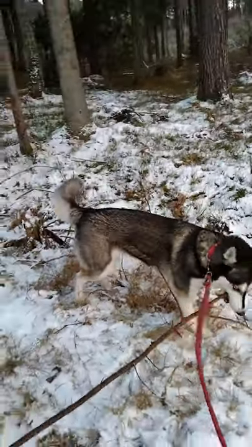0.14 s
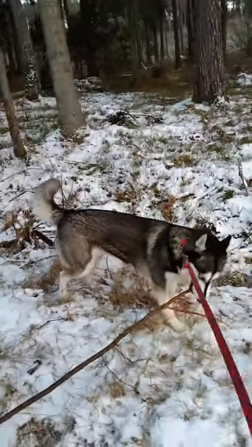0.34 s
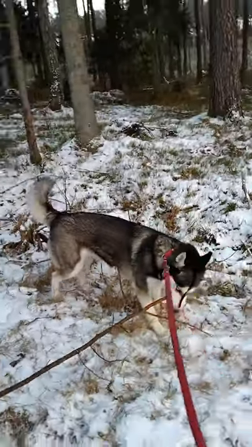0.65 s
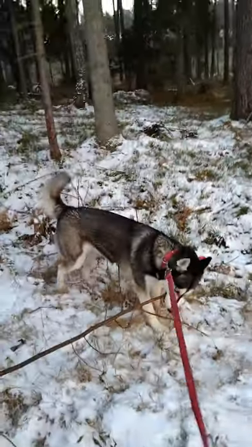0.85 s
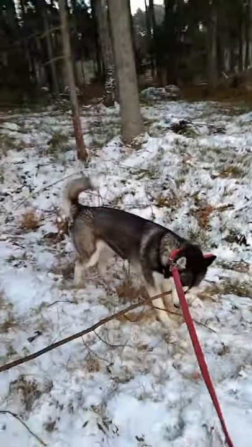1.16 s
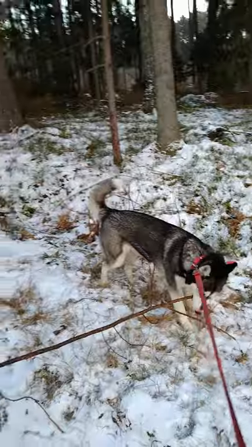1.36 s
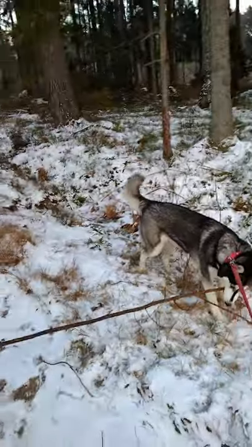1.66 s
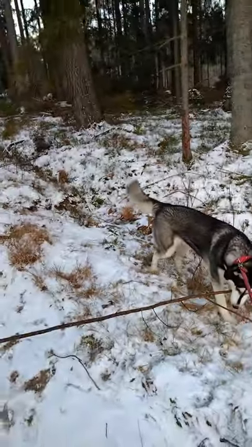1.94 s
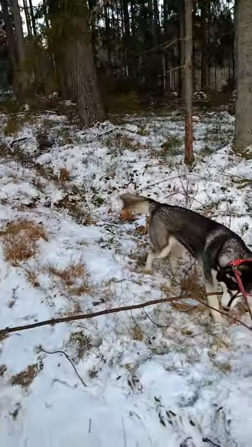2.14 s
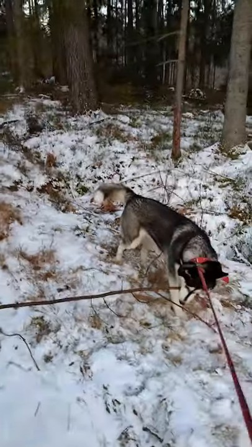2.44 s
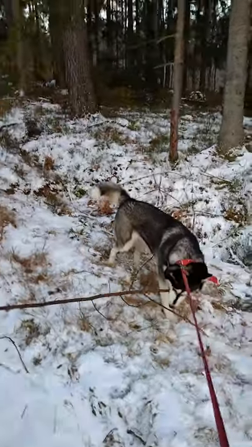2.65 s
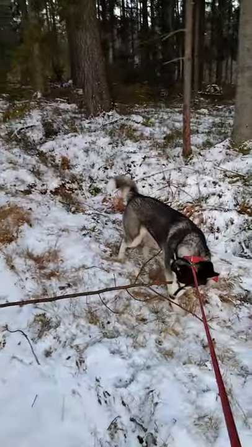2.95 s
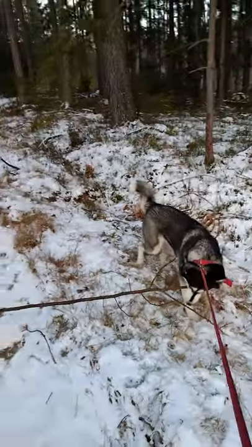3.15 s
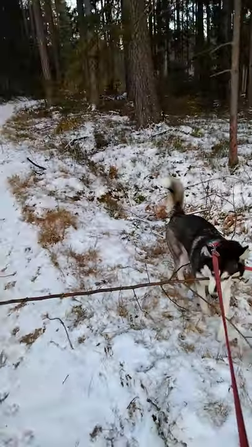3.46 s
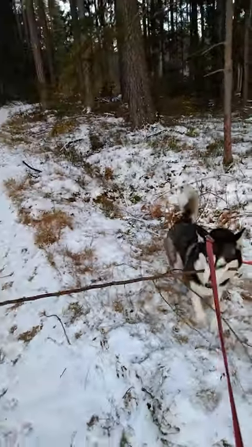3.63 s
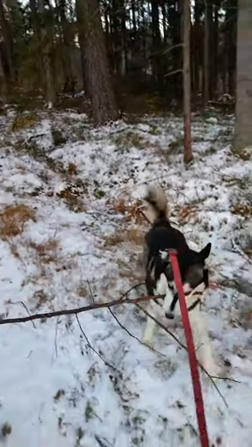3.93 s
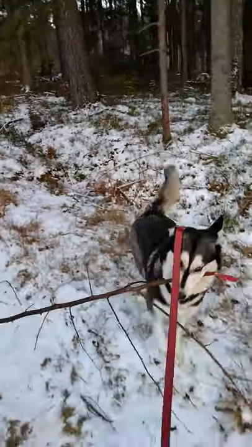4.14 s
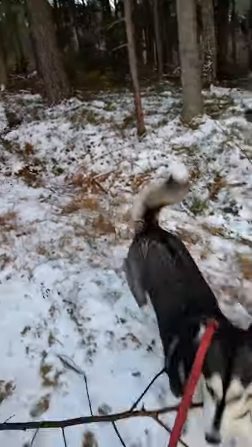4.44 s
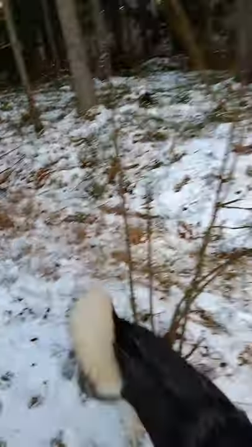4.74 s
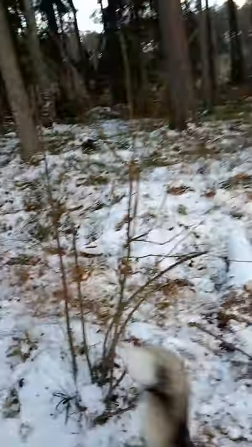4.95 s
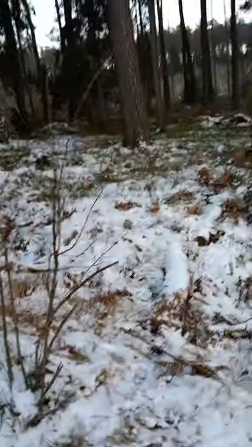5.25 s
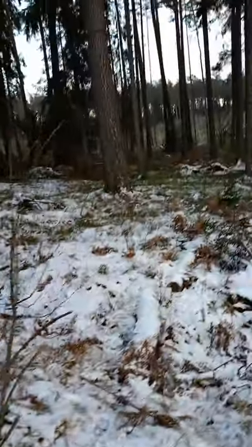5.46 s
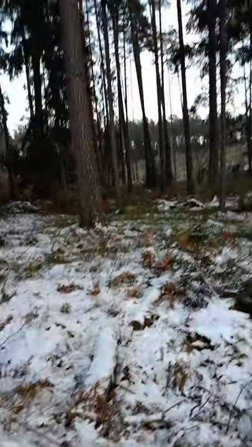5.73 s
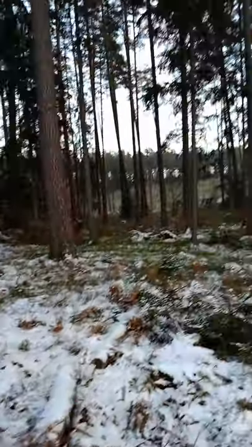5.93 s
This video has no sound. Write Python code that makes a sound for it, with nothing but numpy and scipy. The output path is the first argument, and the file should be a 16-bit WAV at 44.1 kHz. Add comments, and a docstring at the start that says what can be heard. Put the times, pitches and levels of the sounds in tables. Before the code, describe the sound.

Paws and boots crunch softly through thin forest snow, then dry undergrowth rustles and twigs snap sharply as the walk quickens, with leash-hook ticks.

```python
"""Snow crunches softly under a foot, then paws and boots move on through thin snow and dry undergrowth in a forest.
Dense random clicks ring as crushed crystals and rustling leaves; short noise bursts make twigs and stems crack.
Fading tones make soft thuds and the ticks of a leash hook, and a rising tone makes a thin squeak.
A noise suppressor darkens the quiet bands, and filters take away the deepest bass and highest treble."""
import sys
import numpy as np
from scipy import signal
from scipy.io import wavfile
from scipy.ndimage import uniform_filter1d

SR = 44100
rng = np.random.default_rng(int(sys.argv[2]) if len(sys.argv) > 2 else 0)


def unload_audio(sound):
    """Save the sound as a 16-bit wav file, at the path given as the first command line argument."""
    columns = np.transpose(np.atleast_2d(sound))
    # keep every value between -1 and 1, then stretch to whole-number steps
    steps = np.round(np.clip(columns, -1, 1) * 32767)
    wavfile.write(sys.argv[1], SR, steps.astype(np.int16))


def gain_from_db(level_db):
    """Convert decibel levels to linear amplitude factors (20 dB per decade)."""
    decades = np.asarray(level_db, float) / 20
    return 10 ** decades


N = 268511  # length in samples

# soft footfalls: start_s, push_level_db, pitch_hz
FOOTFALLS = [(0.162, -51.5, 192), (0.497, -51, 400), (0.757, -56, 178), (0.887, -51.5, 313),
             (1.078, -59.5, 350), (1.364, -58.5, 151), (1.44, -46.5, 308), (2.061, -55, 282),
             (2.573, -60.5, 95), (2.642, -51.5, 146), (3.134, -53, 500), (3.345, -61, 139),
             (3.732, -47.5, 190), (4.387, -60.5, 467), (4.545, -54.5, 130), (4.75, -49.5, 130),
             (4.975, -44, 165), (5.346, -46, 216), (5.706, -48.5, 106)]
# bright resonances of rustle and microphone port: pitch_hz, width_hz, relative_level_db
RUSTLE_RESONANCES = [(3000, 1210, -5.5), (3800, 626, -1), (5000, 1110, -8), (7400, 1180, -4.5),
                     (10000, 37000, -19.5), (15200, 1120, -9)]
# resonances of crushed snow: pitch_hz, width_hz, relative_level_db
SNOW_RESONANCES = [(1008, 687, 3), (1406, 404, 5.5), (1860, 362, 3)]
# levels between events: crunch_db, rustle_db, upper_packing_db, lower_packing_db, rumble_db
QUIET_DB = (-63.5, -68.5, -74.5, -81, -80.5)
WIDEST_SNAP_HZ = 1970  # widest resonance of a snapping twig or stem
EVENT_S = 0.07  # longest ring of a single event


def rms_one(x):
    """Scale to an average (rms) strength of 1."""
    return x / np.sqrt(np.mean(x ** 2) + 1e-20)


def band(x, low_hz, high_hz, order=2):
    """Keep the pitches between two limits (Butterworth band-pass)."""
    return signal.sosfilt(signal.butter(order, [low_hz, high_hz], "band", fs=SR, output="sos"), x)


def resonate(x, hz, width_hz):
    """Ring like one small body: a resonance with gain 1 at its top."""
    r = np.exp(-np.pi * width_hz / SR)
    feedback = [1, -2 * r * np.cos(2 * np.pi * hz / SR), r * r]
    return signal.lfilter([(1 - r * r) / 2, 0, (r * r - 1) / 2], feedback, x)


def ring_all(x, resonances):
    """Ring several resonances side by side, each at its own level."""
    return sum(gain_from_db(level_db) * resonate(x, hz, width_hz) for hz, width_hz, level_db in resonances)


def drift(rate_hz):
    """Slow random wandering with spread 1, from smoothed noise."""
    r = np.exp(-2 * np.pi * rate_hz / SR)
    wander = signal.lfilter([1], [1, -2 * r, r * r], rng.standard_normal(N + SR))
    return rms_one(wander[SR:])


def grains(per_s, spread_db, clump_db, smooth):
    """Random clicks of uneven size come in clumps over smooth noise; pockets of crust give way and die off."""
    collapses_per_s, collapse_fade_s, collapse_db = 55.0, 0.005, -6.5
    born = rng.random(N) < per_s / SR
    sizes = gain_from_db(spread_db * np.minimum(rng.exponential(1, N), 5)) * rng.choice([-1, 1], N)
    pocket_sizes = gain_from_db(collapse_db) * np.minimum(rng.exponential(1, N), 4)
    pockets = (rng.random(N) < collapses_per_s / SR) * pocket_sizes
    fade = np.exp(-1 / (collapse_fade_s * SR))
    collapsing = 1 + signal.lfilter([1], [1, -fade], pockets + 1e-18)
    clicks = rms_one(born * sizes) + smooth * rng.standard_normal(N)
    return collapsing * gain_from_db(clump_db * drift(20.7)) * clicks


def texture(source, resonances, patchy_db):
    """Grains ring every resonance, each flickering on its own."""
    layers = []
    for k, (hz, width_hz, level_db) in enumerate(resonances):
        flicker = gain_from_db(level_db + patchy_db * drift(7.3))
        layers.append(flicker * (-1) ** k * resonate(source, hz, width_hz))
    return rms_one(sum(layers))


def placed(times, sounds):
    """Short sounds laid down at their start times; overlaps add."""
    out = np.zeros(N + SR)
    for start_s, sound in zip(times, sounds):
        out[round(start_s * SR):][:len(sound)] += sound
    return out[:N]


def squeak():
    """A thin tone glides upward, swelling and fading, as of a crust slipping."""
    # one squeak: start_s, length_s, from_hz, to_hz, level_db
    glide = (.992, .036, 2950, 3850, -61)
    start_s, length_s, low_hz, high_hz, level_db = glide
    part = np.clip((np.arange(N) / SR - start_s) / length_s, 0, 1)  # share of the glide done
    phase = 2 * np.pi * np.cumsum(low_hz + (high_hz - low_hz) * part) / SR
    return gain_from_db(level_db) * np.sin(np.pi * part) * np.sin(phase)


def hook_ticks():
    """The small metal hook of the leash rings in short, pure, fading tones."""
    # one ring a row: start_s, level_db, pitch_hz
    hook_rings = [(5.293, -38.5, 9030), (5.353, -27.5, 8400), (5.353, -29.5, 13600), (5.3635, -28, 8400),
                  (5.354, -30.5, 5000), (5.518, -32, 13650)]
    start_s, level_db, hz = np.transpose(hook_rings)[:, :, None]
    t = np.arange(int(EVENT_S * SR)) / SR
    rings = gain_from_db(level_db) * np.exp(-t / 0.006) * np.sin(2 * np.pi * hz * t)
    return placed(start_s[:, 0], rings)


def thuds():
    """A soft push rings the ground for a few cycles, with a dull puff of snow."""
    t = np.arange(int(EVENT_S * SR)) / SR
    rise = t / 0.004  # the push is strongest after 4 ms
    push = rise * np.exp(1 - rise)
    noises = rng.standard_normal((len(FOOTFALLS), len(t)))
    sounds = []
    for (_, push_db, hz), noise in zip(FOOTFALLS, noises):
        puff = rms_one(band(noise, hz, 2300, order=3))
        sounds.append(gain_from_db(push_db) * push * (np.sin(2 * np.pi * hz * t) + 0.6 * puff))
    return placed(np.transpose(FOOTFALLS)[0], sounds)


def stem_snaps():
    """The loudest dry stems break in one short tick each: broad, with a pitch of its own."""
    # start_s, peak_db, pitch_hz
    loud_stems = [(1.286, -39, 14800), (4.06, -42, 13000), (4.815, -30.5, 7400), (5.0547, -20.5, 6850),
                  (5.183, -24, 14900), (5.293, -32.5, 12600), (5.378, -30.5, 7850), (5.466, -33, 15000),
                  (5.492, -37, 14300), (5.571, -31.5, 6470), (5.829, -26.5, 8540), (5.8618, -36, 7000),
                  (5.9225, -28, 3670), (5.944, -30.5, 3800)]
    t = np.arange(int(EVENT_S * SR)) / SR
    noises = rng.standard_normal((len(loud_stems), len(t)))
    ticks = []
    for (_, peak_db, hz), noise in zip(loud_stems, noises):
        burst = noise * np.exp(-t / 0.0022)
        pitched = resonate(burst, hz, min(0.16 * hz, WIDEST_SNAP_HZ))
        tick = 3.2 * pitched + ring_all(burst, RUSTLE_RESONANCES)
        ticks.append(gain_from_db(peak_db) * tick / abs(tick).max())
    return placed(np.transpose(loud_stems)[0], ticks)


def cracks():
    """Splintering twigs and crust: a noise burst gives a knock and a bright snap at its own pitch."""
    # start_s, knock_peak_db, snap_peak_db, snap_pitch_hz, length_ms
    breaks = [(0.364, -38.5, -52, 2830, 8.2), (0.766, -44, -46, 4220, 4.4), (0.796, -39.5, -45, 3660, 12),
              (1.82, -37, -43.5, 4150, 5.7), (2.063, -50.5, -67, 1500, 7.5), (3.063, -38, -47, 5130, 3.2),
              (3.141, -41.5, -52, 3000, 15), (3.9453, -30, -42.5, 3650, 1.9),
              (4.1431, -32, -35, 14600, 4.5), (4.224, -28, -36, 6440, 9), (4.378, -34, -56, 5860, 2.8),
              (4.433, -33.5, -60, 3700, 5), (4.564, -33.5, -46, 7400, 8.6), (4.99, -30.5, -31, 13200, 2.8),
              (5.0169, -25, -27.5, 3800, 0.68), (5.1389, -32.5, -32.5, 3430, 5.7),
              (5.3511, -34.5, -29.5, 5000, 10.3), (5.3621, -30.5, -24.5, 6120, 7.4),
              (5.411, -39, -28, 6500, 8.8), (5.517, -39, -32.5, 5950, 9.2), (5.717, -26, -25.5, 7400, 13.6),
              (5.746, -30, -31, 3800, 33), (5.8, -54, -33.5, 3800, 13), (5.828, -39, -30, 15400, 14),
              (5.8636, -25.5, -20.5, 3350, 0.55), (6.008, -41.5, -35, 3600, 21),
              (6.069, -41.5, -43, 3360, 8.8)]
    t = np.arange(int(EVENT_S * SR)) / SR
    splinters = rng.standard_normal((len(breaks), len(t)))
    sounds = []
    for (_, knock_db, snap_db, hz, length_ms), noise in zip(breaks, splinters):
        length_s = length_ms / 1000
        # short cracks break sharply, long ones swell; splintering stops short, then a faint tail
        sharp = 2 * np.exp(-length_s / 0.006 - t / 0.0012)
        swell = np.minimum(8 * t / length_s, 1) * np.exp(-(t / length_s) ** 3)
        tail = 0.12 * np.exp(-t / 0.01)
        burst = noise * (sharp + swell + tail)
        lowest_hz = 1006 * gain_from_db(0.4 * (knock_db + 34.5))  # harder knocks are brighter
        knock = band(ring_all(burst, SNOW_RESONANCES), lowest_hz, 2300)
        width_hz = min(0.44 * hz, WIDEST_SNAP_HZ)
        pitched = resonate(resonate(burst, hz, width_hz), hz, width_hz)
        snap = pitched + 0.86 * ring_all(burst, RUSTLE_RESONANCES)
        knock = gain_from_db(knock_db) * knock / abs(knock).max()
        snap = gain_from_db(snap_db) * snap / abs(snap).max()
        sounds.append(knock + snap)
    return placed(np.transpose(breaks)[0], sounds)


def summed(shapes, levels_db, still_db):
    """Overlapping events add in power over a quiet floor; gives a level in dB at every sample."""
    event_power = gain_from_db(2 * np.asarray(levels_db))[:, None] * shapes ** 2
    power = gain_from_db(2 * still_db) + event_power.sum(axis=0)
    return np.interp(np.arange(N), np.arange(len(power)) * 64, 10 * np.log10(power))


def efforts():
    """Steps rise fast, sag and lift off; brushes swell and fade; footfalls leave a dying rumble."""
    # a foot sinks into the snow: start_s, length_s, crunch_db, lower_packing_db
    steps = [(0.0, 0.24, -54.5, -58.5), (0.484, 0.57, -57, -72.5), (0.765, 0.2, -52, -61.5),
             (1.426, 0.35, -53.5, -59.5), (2.271, 0.36, -54, -63.5), (2.962, 0.18, -55.5, -78),
             (3.139, 0.38, -50.5, -60), (3.45, 0.1, -51, -67), (3.593, 0.3, -47, -58.5),
             (3.935, 0.17, -47, -74), (4.083, 0.066, -47, -64.5), (4.225, 0.15, -48, -73),
             (4.408, 0.12, -50.5, -65.5), (4.592, 0.15, -52, -61.5), (4.71, 0.43, -52.5, -57.5),
             (4.967, 0.11, -58, -56.5), (5.14, 0.1, -58.5, -57.5), (5.36, 0.42, -49.5, -63.5),
             (5.543, 0.14, -60, -55.5), (5.7, 0.25, -67, -58), (5.83, 0.07, -45, -58)]
    # legs brush through the undergrowth: middle_s, length_s, rustle_db
    brushes = [(0.216, 0.29, -61), (0.505, 0.6, -62.5), (0.748, 0.19, -62), (1.255, 0.18, -61.5),
               (1.594, 0.61, -61), (2.218, 0.19, -65), (2.498, 0.34, -57.5), (2.78, 0.3, -61),
               (2.96, 0.094, -61), (3.665, 0.5, -50.5), (3.986, 0.16, -67), (4.113, 0.17, -55.5),
               (4.323, 0.23, -58.5), (4.495, 0.16, -51.5), (4.743, 0.38, -51.5), (5.004, 0.26, -51),
               (5.212, 0.36, -52), (5.478, 0.39, -51), (5.761, 0.42, -49), (5.99, 0.15, -51.5)]
    rise_s, lift_s, packing_linger_s = 0.019, 0.078, 0.081
    crunch_sag, upper_sag, lower_sag, rumble_fade = 8.5, 26, 38.5, 33.5  # dB per second
    still_crunch, still_rustle, still_upper, still_lower, still_rumble = QUIET_DB
    t = np.arange(N // 64 + 2) * 64 / SR  # one point every 64 samples

    start_s, length_s, crunch_db, lower_db = np.transpose(steps)
    upper_db = lower_db + (1 - 0.57) * (crunch_db - lower_db)  # between packing and crunch
    since = t - start_s[:, None]
    rise = np.clip(since / rise_s + 1, 0, 1)
    lifted = np.maximum(since - length_s[:, None], 0)
    crunching = rise * np.exp(-lifted / lift_s) * gain_from_db(-crunch_sag * since)
    packing = rise * np.exp(-lifted / packing_linger_s)

    middle_s, span_s, rustle_db = np.transpose(brushes)
    swell = np.cos(np.pi * np.clip((t - middle_s[:, None]) / span_s[:, None], -0.5, 0.5))
    scuff_db = still_crunch + 4.0 + 0.81 * (rustle_db - still_crunch)  # brushing also scuffs the snow

    fall_s, fall_db, _ = np.transpose(FOOTFALLS)
    after = t - fall_s[:, None]
    shaken = (after > 0) * gain_from_db(-rumble_fade * abs(after))

    moves = np.vstack([crunching, swell])
    step_rustle_db = crunch_db - 12  # a step also stirs the undergrowth
    return (summed(moves, np.r_[crunch_db, scuff_db], still_crunch),
            summed(moves, np.r_[step_rustle_db, rustle_db], still_rustle),
            summed(packing * gain_from_db(-upper_sag * since), upper_db, still_upper),
            summed(packing * gain_from_db(-lower_sag * since), lower_db, still_lower),
            summed(shaken, fall_db - 14, still_rumble))


def ground_rumble(rumble_db):
    """The ground rumbles on after a footfall: sparse grains in the bass."""
    sparse = grains(400.0, spread_db=2.0, clump_db=-2.0, smooth=0.65)
    return gain_from_db(rumble_db) * rms_one(band(sparse, 73.5, 343, order=3))


def packed_snow(coarse, fine, upper_db, lower_db, rustle_db):
    """Snow packs under the foot and is pushed aside by brushing legs: grains and noise in low bands."""
    upper = rms_one(band(coarse, 784, 1075, order=3)) * gain_from_db(upper_db + 2.0 * drift(9.6))
    lower = rms_one(band(coarse, 477, 773, order=3)) * gain_from_db(lower_db + 2.0 * drift(53.0))
    pushed = gain_from_db(-66 + 1.57 * (rustle_db + 48))  # grows faster than the rustle
    deep = rms_one(band(fine, 188, 492, order=3)) * (gain_from_db(lower_db - 4) + pushed)
    return upper + lower + deep


def small_stems(rustle_db):
    """Single dry stems snap now and then, each ringing at one of ten pitches."""
    per_s = 98.0 * gain_from_db(0.46 * (rustle_db + 51.5))  # more of them in hard rustling
    sizes = gain_from_db(5.5 * np.minimum(rng.exponential(1, N), 3))
    stems = (rng.random(N) < per_s / SR) * sizes
    pitches_hz = np.geomspace(1200, 15000, num=10)
    dealt = rng.integers(0, 10, N)
    return sum(resonate(stems * (dealt == k) + 1e-18, hz, 650.0) for k, hz in enumerate(pitches_hz))


def rustling(fine, rustle_db):
    """Leaves and stems rub: fine noise rings bright resonances, with small snaps among it."""
    rustle = rms_one(band(texture(fine, RUSTLE_RESONANCES, patchy_db=1.3), 1460, 19000, order=3))
    above_quiet_db = np.maximum(rustle_db - QUIET_DB[1], 0)
    rustle = rustle * gain_from_db(0.1 * above_quiet_db * drift(48.0))  # hard rustling is lumpier
    return gain_from_db(rustle_db) * (rustle + gain_from_db(16.5) * small_stems(rustle_db))


def crushed_snow(coarse, crunch_db):
    """Snow crystals crush: dense grains ring the resonances of the snow."""
    crunch = rms_one(band(texture(coarse, SNOW_RESONANCES, patchy_db=0.93), 1324, 2330, order=3))
    brighter = gain_from_db(0.49 * (crunch_db + 39.0)) - 1  # harder crushing is brighter
    return gain_from_db(crunch_db) * (crunch + brighter * band(crunch, 1360, 2870))


def walk():
    """Crunch, rustle and packing share the clumps of the same crushing, over a rumble of the ground."""
    crunch_db, rustle_db, upper_db, lower_db, rumble_db = efforts()
    coarse = grains(900.0, spread_db=3.0, clump_db=1.5, smooth=1.0)
    fine = rng.standard_normal(N) + 0.73 * rms_one(coarse)
    snow = crushed_snow(coarse, crunch_db) + packed_snow(coarse, fine, upper_db, lower_db, rustle_db)
    return snow + rustling(fine, rustle_db) + ground_rumble(rumble_db)


def scene():
    """All sources together, in one channel."""
    return (squeak() + hook_ticks() + thuds() + stem_snaps() + cracks() + walk())[None]


def suppress(x):
    """Narrow bands sink while they stay near a fixed noise estimate, open quickly and close more slowly."""
    estimate_db, deepest_db, close_db_per_frame = -83, -9, 1.8  # a frame is 128 samples
    hz, _, z = signal.stft(x, SR, nperseg=512, noverlap=384)
    power = uniform_filter1d(abs(z) ** 2, size=3, axis=0)
    power = signal.lfilter([0.2], [1, -0.8], power, axis=1)
    noise = gain_from_db(2 * estimate_db) / (1 + (hz[:, None] / 1100) ** 4)  # highest in the bass
    gain = np.clip(1 - noise / (power + 1e-20), 1e-3, 1)
    gain_db = np.maximum(20 * np.log10(gain), deepest_db)
    # the gain may rise freely but falls no faster than the closing speed
    fall_db = close_db_per_frame * np.arange(z.shape[1])
    gain_db = np.maximum.accumulate(gain_db + fall_db, axis=1) - fall_db
    return signal.istft(z * gain_from_db(gain_db), SR, nperseg=512, noverlap=384)[1][:N]


def band_limit(x):
    """A steep low-pass at the top of the band."""
    return signal.sosfilt(signal.butter(12, 16800, fs=SR, output="sos"), x)


def record(dry):
    """The small microphone's bass roll-off, then the noise suppressor and a steep treble cut."""
    x = signal.sosfilt(signal.butter(3, 66, "high", fs=SR, output="sos"), dry[0])
    x = suppress(x)
    x = signal.sosfilt(signal.cheby2(16, 28, 15750, fs=SR, output="sos"), x)  # 28 dB down from 15750 Hz
    return band_limit(x[None])


dry = scene()
out = record(dry)
unload_audio(out)
```